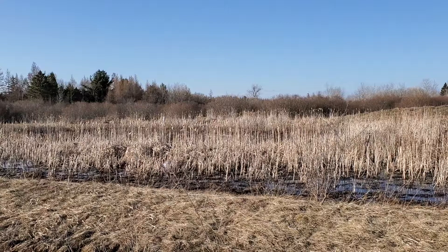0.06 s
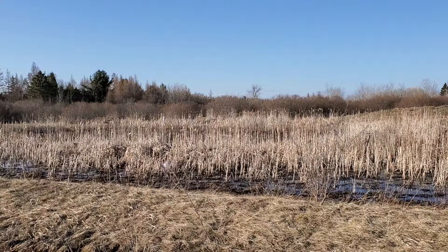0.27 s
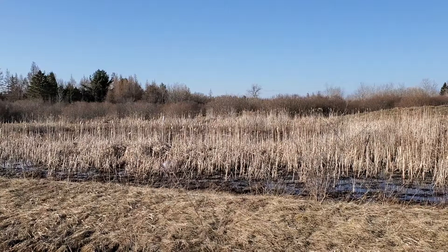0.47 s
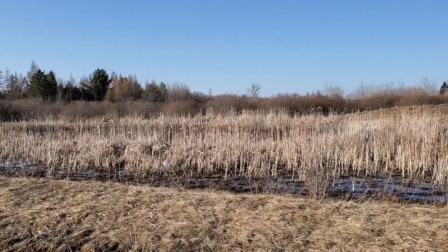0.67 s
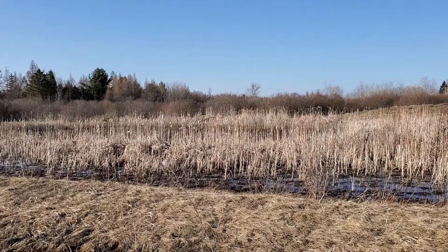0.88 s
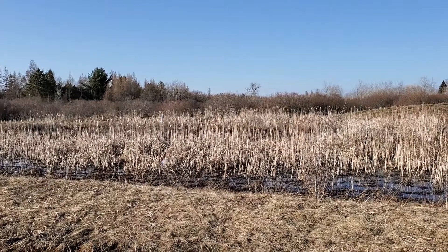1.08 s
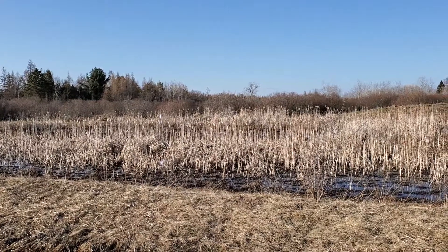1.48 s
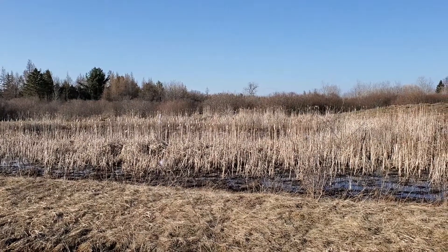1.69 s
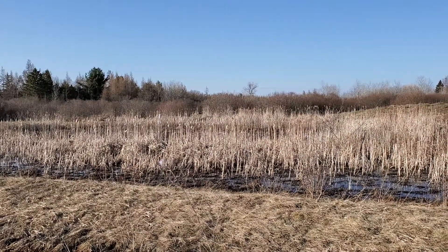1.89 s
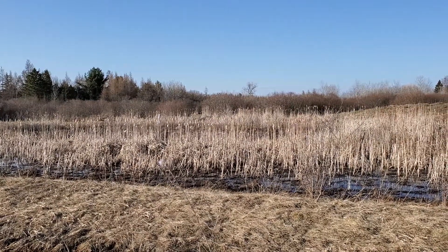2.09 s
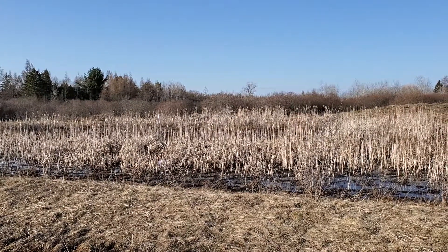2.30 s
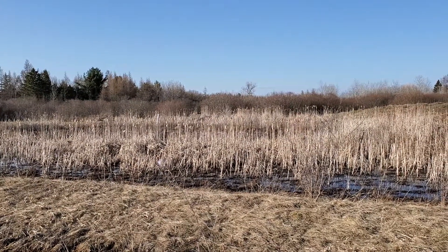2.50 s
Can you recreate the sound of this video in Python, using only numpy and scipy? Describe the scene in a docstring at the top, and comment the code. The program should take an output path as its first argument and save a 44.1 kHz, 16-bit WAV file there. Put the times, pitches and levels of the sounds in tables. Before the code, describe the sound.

A blackbird trills in a windy marsh, with faint distant birds and microphone rumble.

```python
"""Blackbird in a windy reed marsh.

A blackbird trills in fast gliding notes; farther off, birds answer with warbled buzzes and thin
whistles, and something croaks. The reeds scatter the calls, over a distant chorus and faint hiss.
Gusts buffet each of two microphone ports in its own way; late on, dull handling knocks reach the right."""
import sys
import numpy as np
from scipy import signal
from scipy.fft import rfft, irfft, next_fast_len
from scipy.io import wavfile
from scipy.ndimage import uniform_filter1d

SR = 44100
rng = np.random.default_rng(int(sys.argv[2]) if len(sys.argv) > 2 else 0)


def unload_wav(signal):
    """Save mono or channel-first audio to the path in sys.argv[1] as 16-bit WAV at rate SR, clipped to [-1, 1]."""
    wavfile.write(
        sys.argv[1],
        SR,
        np.round(np.clip(np.atleast_2d(signal).T, -1, 1) * 32767).astype(np.int16),
    )


N = 116865
T = np.arange(N) / SR
NEAR_LAG_MS, FAR_LAG_MS = 0.33, 0.47

# noise spectra: freq_hz, relative_db
HISS_SPECTRUM = [(250, 31.1), (1300, 20.2), (2500, 14), (8500, 6), (15000, 13)]
CHORUS_SPECTRUM = [(400, -24.5), (950, 2.5), (1700, 5), (2750, 3), (4200, -5), (6700, -2.5), (8700, -24.5)]
RUMBLE_SPECTRUM = [(15, -27.5), (45, -2), (78, 3.5), (110, -7), (220, -20), (700, -73.5)]
FLUTTER_SPECTRUM = [(90, -21.5), (170, 4.5), (350, -2), (1000, -47), (3000, -87.5)]
KNOCK_SPECTRUM = [(170, -32), (320, 6), (480, 3.5), (750, -15), (1700, -33), (6000, -87)]
# chorus and wind envelopes: time_s, level_db
CHORUS_LEVELS = [(0, -78.5), (.5, -71.5), (1.42, -93), (1.62, -75), (1.83, -78), (1.91, -101),
                 (2.02, -82.5), (2.1, -75), (2.65, -80)]
GUSTS_LEFT = [(0, -38.5), (.11, -57), (.13, -43.5), (.66, -21), (.68, -29), (1.04, -28.5), (1.08, -50.5),
              (1.32, -35), (1.4, -55), (1.55, -76), (1.63, -47.5), (1.78, -34.5), (1.9, -48), (2.22, -31.5),
              (2.3, -31), (2.38, -28.5), (2.62, -33.5), (2.65, -51)]
GUSTS_RIGHT = [(0, -39.5), (.37, -25.5), (.62, -26), (0.651, -26.5), (0.799, -22.5), (0.878, -11.5),
               (0.927, -12.5), (0.942, -44), (0.963, -27), (1.13, -38.5), (1.289, -30), (1.43, -51),
               (1.731, -42), (1.78, -30), (1.92, -71.5), (2.15, -77)]
# strong eddies: peak_s, length_s, pitch_hz, level_db, port
EDDY_THUMPS = [(0.374, 0.035, 85.8, -21.5, "right"), (0.438, 0.01754, 234, -26, "right"),
               (0.515, 0.033, 89.7, -18, "left"), (0.552, .06, 163.8, -18, "right"),
               (0.614, 0.044, 87, -17, "left"), (0.699, 0.027, 114.4, -19.5, "right"),
               (0.891, 0.081, 114.9, -11.5, "right"), (.903, 0.022, 215, -9, "right")]
# handling knocks: peak_s, time_constant_s, level_db
HANDLING_KNOCKS = [(2.015, 0.0031, -27.5), (2.06, 0.0063, -42), (2.086, 0.0084, -35),
                   (2.201, 0.0071, -42.5), (2.227, 0.012, -48), (2.372, 0.0063, -37.5),
                   (2.396, 0.0055, -35.5), (2.438, 0.0056, -34.5), (2.527, .005, -42),
                   (2.584, 0.0056, -44.5)]
# echo decay: freq_hz, t60_s
MARSH_DECAY = [(2000, 0.23), (7000, 0.41)]
# croaks: start_s, length_s, pitch_hz, level_db
FAR_CROAKS = [(0.125, 0.046, 1893, -79), (0.471, 0.024, 1542, -59), (1.194, 0.015, 1613, -63.5),
              (1.458, 0.26, 1583, -72), (1.577, 0.01, 1790, -56.5), (2.191, 0.014, 1695, -60.5),
              (2.392, 0.022, 1857, -58.5), (2.568, 0.0093, 1670, -56), (2.602, 0.015, 1692, -54)]
# whistles and chips: start_s, length_s, first_hz, last_hz, roughness, level_db
FAR_WHISTLES = [(0.126, 0.16, 6220, 5340, 0.074, -70.5), (0.905, 0.06, 3773, 3840, 0.048, -65.5),
                (1.272, 0.11, 2630, 3040, 0.023, -78.5), (1.752, 1, 2624, 3018, 0.056, -75.5),
                (2.077, 0.06, 3747, 3930, 0.056, -63.5), (2.473, 0.099, 2207, 2540, 0.16, -62.5),
                (2.566, 0.067, 4860, 5030, 0.023, -71.5), (2.597, 0.05, 3135, 3255, 0.08, -57)]
# buzzes: start_s, length_s, first_hz, last_hz, first_depth_hz, last_depth_hz, level_db
FAR_BUZZES = [(1.534, 0.33, 4084, 3993, 280, 178, -69), (2.06, 0.34, 4172, 3803, 250, 30.8, -66.5),
              (2.415, 0.21, 3823, 3964, 100, 70, -76)]
# notes opening the trill: start_s, length_s, first_hz, last_hz, level_db, left_minus_right_db
TRILL_OPENING = [(.256, 0.0053, 2415, 2460, -50.5, -6.5), (0.284, .013, 3400, 3286, -51.5, 2),
                 (0.295, 0.0026, 7709, 2990, -52.5, 0)]
# notes of one trill cycle: offset_s, length_s, first_hz, last_hz, level_db, left_minus_right_db
TRILL_CYCLE = [(-0.02, 0.012, 5150, 4900, -65.5, 1.5), (-.0115, .0045, 4380, 3650, -53, 0.5),
               (-.008, 0.01, 3400, 3170, -55.5, -6), (-.0016, 0.0055, 2372, 2580, -53.5, -6),
               (-0.038, .018, 6400, 6600, -78, -5)]


def amp(db):
    return 10 ** (np.asarray(db) / 20)


def unit_rms(x):
    return x / np.sqrt(np.mean(x ** 2) + 1e-20)


def interp_log_hz(points, hz):
    points_hz, values = np.transpose(points)
    return np.interp(np.log(hz + 1), np.log(points_hz + 1), values)


def add(mix, start_s, sound):
    part = mix[:, max(round(start_s * SR), 0):][:, :sound.shape[1]]
    part += sound[:, :part.shape[1]]


def noise(spectrum):
    """Shaped noise, rms 1."""
    gain = amp(interp_log_hz(spectrum, np.fft.rfftfreq(N, 1 / SR)))
    return unit_rms(irfft(rfft(rng.standard_normal(N)) * gain, N))


def jitter(n, smooth_samples=30):
    """Random wander, rms about 1."""
    white = rng.standard_normal(max(n, SR // 2))
    return unit_rms(uniform_filter1d(uniform_filter1d(white, smooth_samples), smooth_samples))[:n]


def place(x, lag_ms, balance_db=0):
    """Sound from one side reaches the left port later."""
    lag = round(lag_ms * SR / 1000)
    return np.array([np.pad(x, (lag, 0)) * amp(balance_db / 2),
                     np.pad(x, (0, lag)) * amp(-balance_db / 2)])


def note(length_s, first_hz, last_hz, roughness, level_db):
    """Glide under a rounded envelope; roughness is jitter as a share of pitch."""
    u = np.linspace(0, 1, max(int(length_s * SR), 2))
    pitch_hz = (first_hz + (last_hz - first_hz) * u) * (1 + roughness * jitter(len(u)))
    envelope = amp(level_db) * np.abs(np.sin(np.pi * u)) ** 0.5
    return envelope * np.sin(2 * np.pi * np.cumsum(pitch_hz) / SR)


def hiss(level_db=-75):
    """Steady noise, independent per port."""
    return amp(level_db) * np.array([noise(HISS_SPECTRUM), noise(HISS_SPECTRUM)])


def chorus(flicker_db=1.8):
    """Many very distant callers blur into a flickering wash."""
    level_db = np.interp(T, *np.transpose(CHORUS_LEVELS)) + flicker_db * jitter(N, 500)
    direct = place(noise(CHORUS_SPECTRUM), FAR_LAG_MS)[:, :N]
    diffuse = np.array([noise(CHORUS_SPECTRUM), noise(CHORUS_SPECTRUM)])
    return amp(level_db) * (direct + 0.5 * diffuse)


def turbulence(spectrum, window_s=0.035):
    """Noise with its slow swell evened out, so the gusts set its level."""
    analytic = signal.hilbert(noise(spectrum), next_fast_len(N))[:N]
    power = np.abs(uniform_filter1d(np.abs(analytic) ** 2, int(window_s * SR)))
    return analytic.real / np.sqrt(power + 1e-9)


def wind(shake_depth_db=6.5, flutter_db=-26, cutoff_hz=2500):
    """Gusts rumble and flutter at each port; single strong eddies thump against one."""
    out = np.zeros((2, N))
    for channel, gusts in enumerate((GUSTS_LEFT, GUSTS_RIGHT)):
        shake_db = shake_depth_db * np.minimum(jitter(N, 800), 1)
        rumble = amp(shake_db) * turbulence(RUMBLE_SPECTRUM)
        flutter = amp(flutter_db + 2.1 * shake_db) * turbulence(FLUTTER_SPECTRUM)
        out[channel] = amp(np.interp(T, *np.transpose(gusts))) * (rumble + flutter)
    for peak_s, length_s, pitch_hz, level_db, port in EDDY_THUMPS:
        thump = note(length_s, pitch_hz, pitch_hz, roughness=0.16, level_db=level_db)
        thump *= np.hanning(len(thump))
        add(out, peak_s - length_s / 2, np.outer([port == "left", port == "right"], thump))
    return signal.sosfilt(signal.butter(4, cutoff_hz, fs=SR, output="sos"), out)


def knocks():
    """Dull handling rubs at the right port, each swelling to a sharp peak."""
    envelope = sum(amp(level_db) * np.exp(-np.abs(T - peak_s) / time_constant_s)
                   for peak_s, time_constant_s, level_db in HANDLING_KNOCKS)
    return np.outer([0, 1], envelope * noise(KNOCK_SPECTRUM))


def reed_echo(calls, scatter_s=0.022, scatter_db=-5, tail_db=-2.5):
    """Quick scatter from nearby reeds, then a tail from the far ones."""
    t = np.arange(SR // 2) / SR
    taps = rng.standard_normal((2, len(t)))
    scatter = taps[:, ::-1] * np.exp(-t / scatter_s)
    hz, frame_s, spectra = signal.stft(taps, SR, nperseg=256)
    decay = amp(-60 * frame_s / interp_log_hz(MARSH_DECAY, hz)[:, None])
    tail = signal.istft(spectra * decay, SR, nperseg=256)[1][:, :len(t)]
    scatter *= amp(scatter_db) / np.linalg.norm(scatter[0])
    tail *= amp(tail_db) / np.linalg.norm(tail[0])
    return signal.fftconvolve(calls, scatter + tail, axes=1)[:, :N]


def croaks(roughness=0.19, sub_octave_db=-15):
    """Distant rough tones, each with a weaker one an octave below."""
    out = np.zeros((2, N))
    for start_s, length_s, pitch_hz, level_db in FAR_CROAKS:
        tone = note(length_s, pitch_hz, pitch_hz, roughness, level_db)
        sub_octave = note(length_s, pitch_hz / 2, pitch_hz / 2, roughness, level_db + sub_octave_db)
        add(out, start_s, place(tone + sub_octave, FAR_LAG_MS))
    return out


def whistles():
    """Thin glides and hoarse chips from across the marsh."""
    out = np.zeros((2, N))
    for start_s, *shape in FAR_WHISTLES:
        add(out, start_s, place(note(*shape), NEAR_LAG_MS))
    return out


def buzzes(warble_hz=48.5, rasp=0.38, flicker_db=3, rise_s=0.087, fall_s=0.025,
           upper_ratio=1.635, upper_db=-14, upper_lead_s=0.016):
    """A far bird's two voices warble together; the upper pulses on its downward sweeps."""
    out = np.zeros((2, N))
    for start_s, length_s, first_hz, last_hz, first_depth_hz, last_depth_hz, level_db in FAR_BUZZES:
        t = np.arange(0, length_s, 1 / SR)
        centre_hz = first_hz + (last_hz - first_hz) * t / length_s
        depth_hz = first_depth_hz + (last_depth_hz - first_depth_hz) * t / length_s
        warble_rad = 2 * np.pi * warble_hz * t + 0.584 * jitter(len(t), 500)
        pitch_hz = centre_hz + depth_hz * (np.sin(warble_rad) + rasp * jitter(len(t)))
        phase_rad = 2 * np.pi * np.cumsum(pitch_hz) / SR
        fade = np.clip(np.minimum(t / rise_s, (length_s - t) / fall_s), 0, 1)
        envelope = fade * amp(level_db + flicker_db * jitter(len(t), 200))
        upper = amp(upper_db) * np.sin(upper_ratio * phase_rad) * (1 - np.cos(warble_rad))
        add(out, start_s, place(envelope * np.sin(phase_rad), FAR_LAG_MS))
        add(out, start_s - upper_lead_s, place(envelope * upper, FAR_LAG_MS))
    return out


def blackbird_note(start_s=2.308):
    """One short, rough note from the near bird."""
    out = np.zeros((2, N))
    tone = note(length_s=0.06, first_hz=1562.5, last_hz=1570, roughness=0.3, level_db=-52)
    add(out, start_s, place(tone, NEAR_LAG_MS))
    return out


def blackbird_trill(first_beat_s=0.3268, cycles=22, cycle_s=0.01851, slowing_s=0.0000957,
                    swell_db=3.5, rasp=0.015, high_rasp=0.043):
    """Three opening notes, then a high-to-low cycle that slows and swells; its high notes are hoarse."""
    out = np.zeros((2, N))
    for start_s, length_s, first_hz, last_hz, level_db, balance_db in TRILL_OPENING:
        tone = note(length_s, first_hz, last_hz, rasp, level_db)
        add(out, start_s, place(tone, NEAR_LAG_MS, balance_db))
    for k in range(cycles):
        beat_s = first_beat_s + cycle_s * k + slowing_s * k * k
        for offset_s, length_s, first_hz, last_hz, level_db, balance_db in TRILL_CYCLE:
            roughness = high_rasp if first_hz > 4000 else rasp
            accent_db = rng.standard_normal() + swell_db * k / cycles
            tone = note(length_s, first_hz, last_hz, roughness, level_db + accent_db)
            add(out, beat_s + offset_s, place(tone, NEAR_LAG_MS, balance_db))
    return out


def scene():
    """Calls and their echo over hiss, chorus, wind and knocks."""
    floor = hiss()
    calls = blackbird_trill() + buzzes() + whistles() + croaks() + blackbird_note()
    return floor + calls + reed_echo(calls) + chorus() + wind() + knocks()


def record(dry):
    """Brief fade-in, then low-pass."""
    fade_s, cutoff_hz = 0.01, 15800
    lowpass = signal.firwin(511, cutoff_hz, window=("kaiser", 9), fs=SR)
    return signal.oaconvolve(dry * np.minimum(T / fade_s, 1), lowpass[None], "same")


dry = scene()
out = record(dry)
unload_wav(out)
```